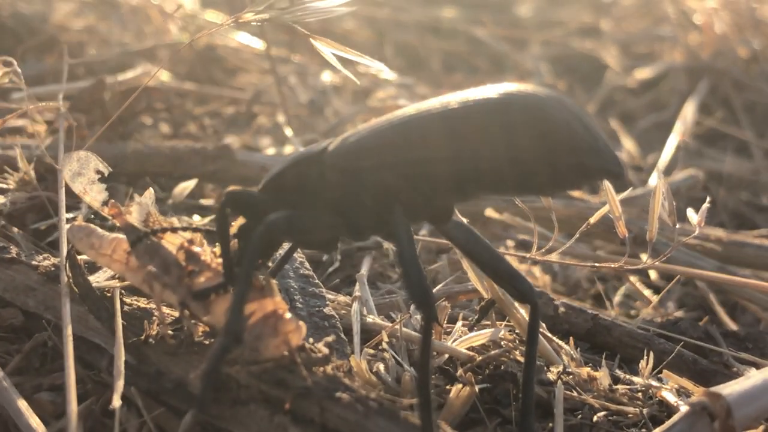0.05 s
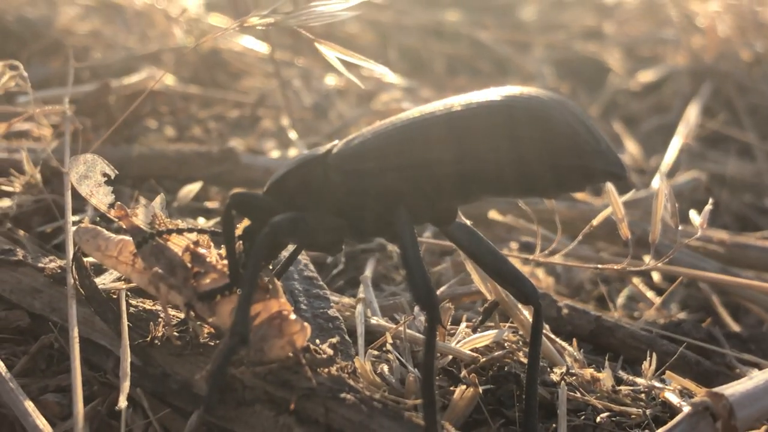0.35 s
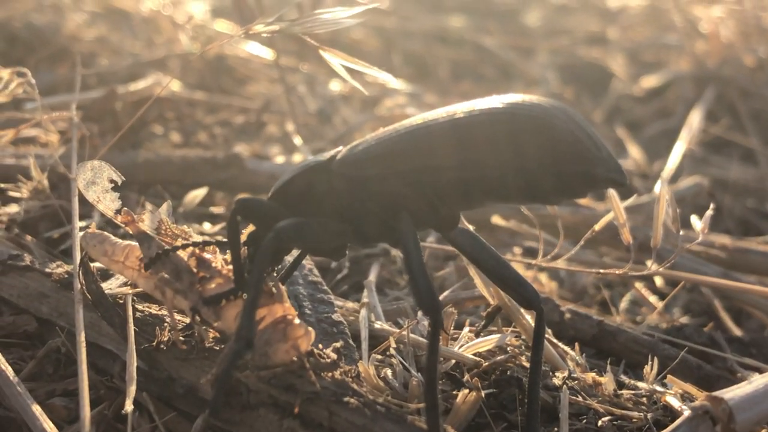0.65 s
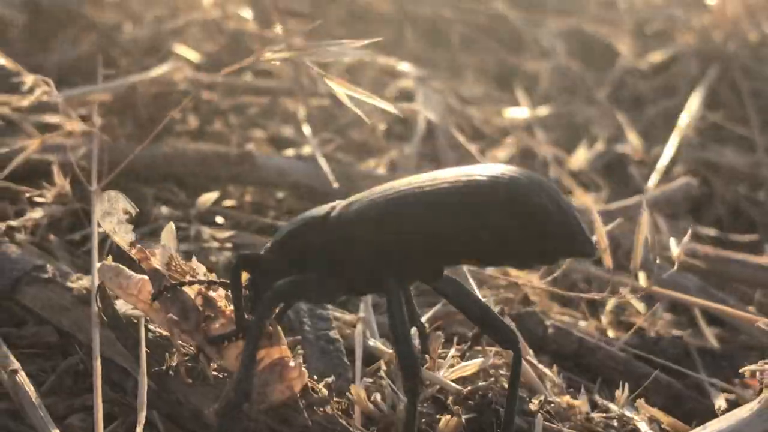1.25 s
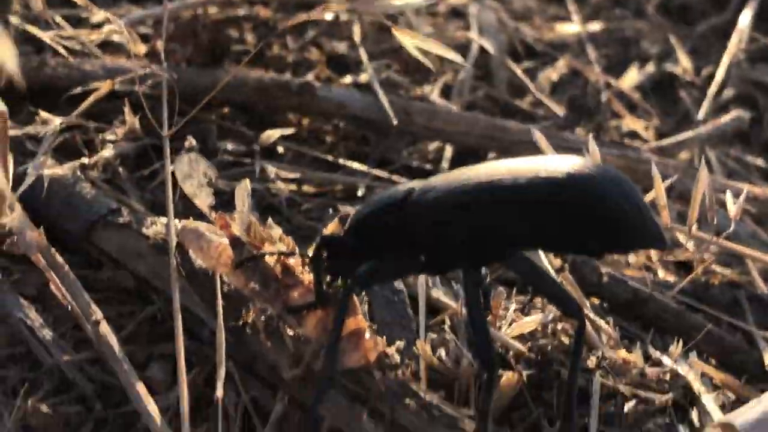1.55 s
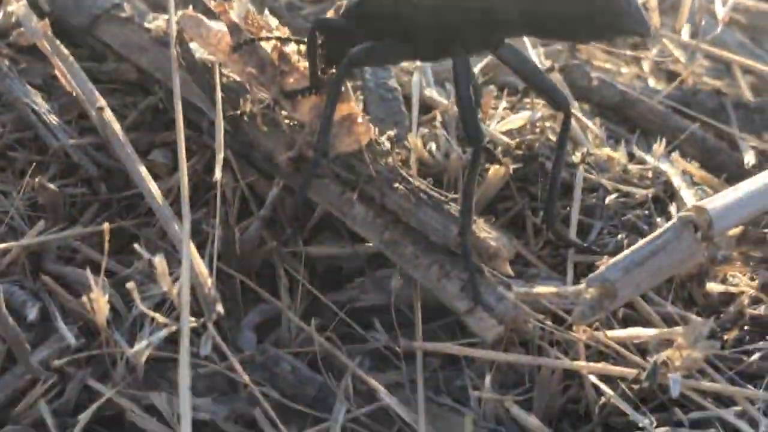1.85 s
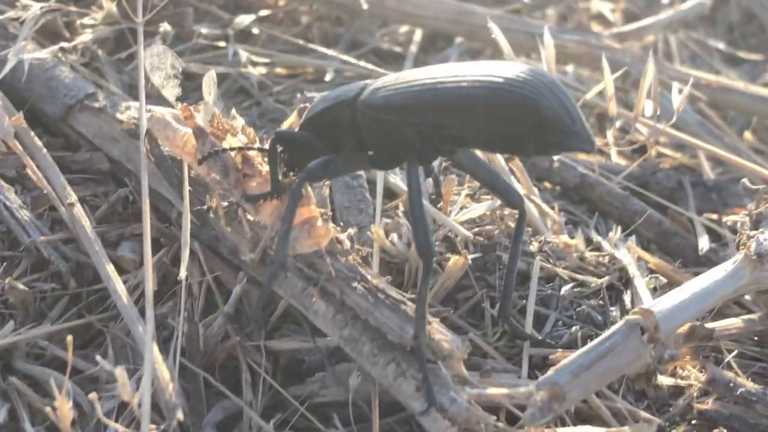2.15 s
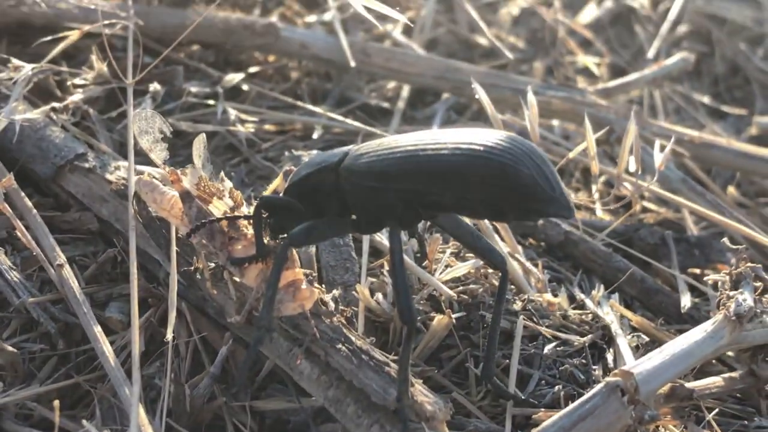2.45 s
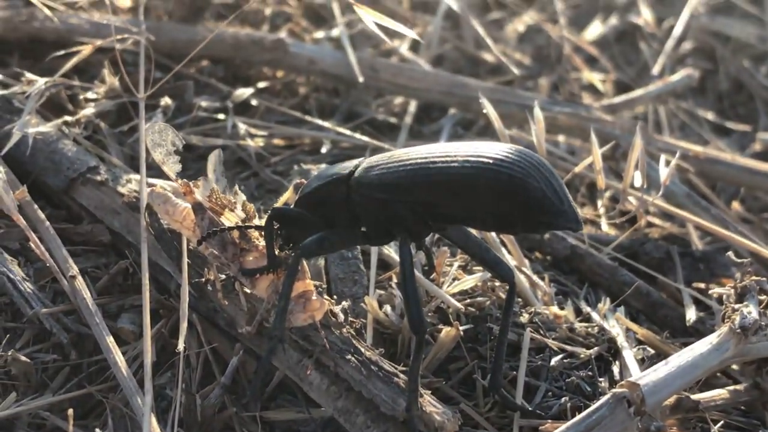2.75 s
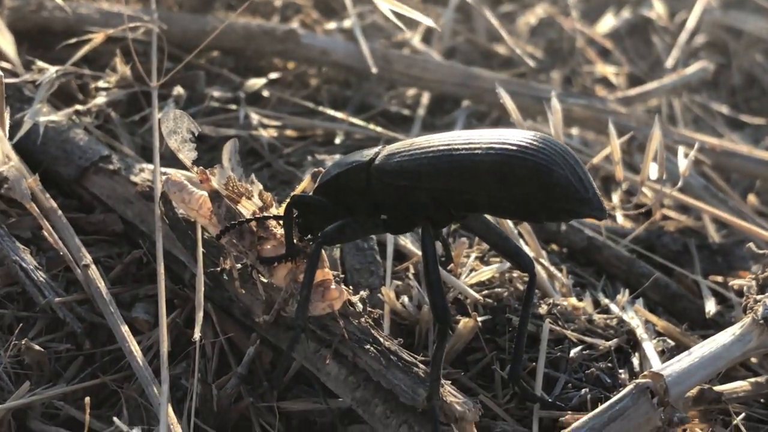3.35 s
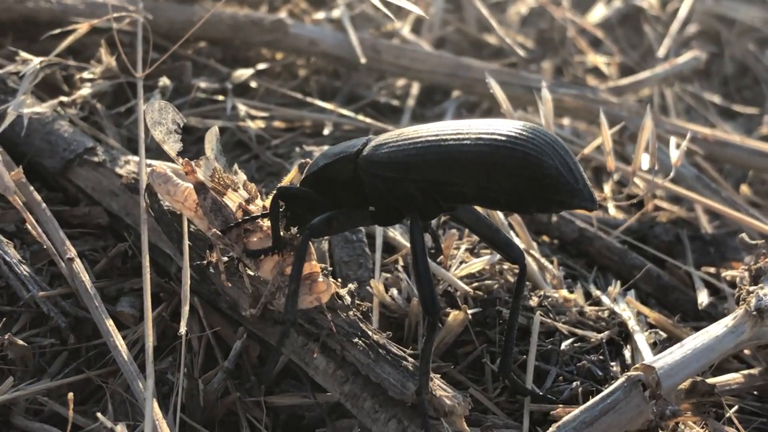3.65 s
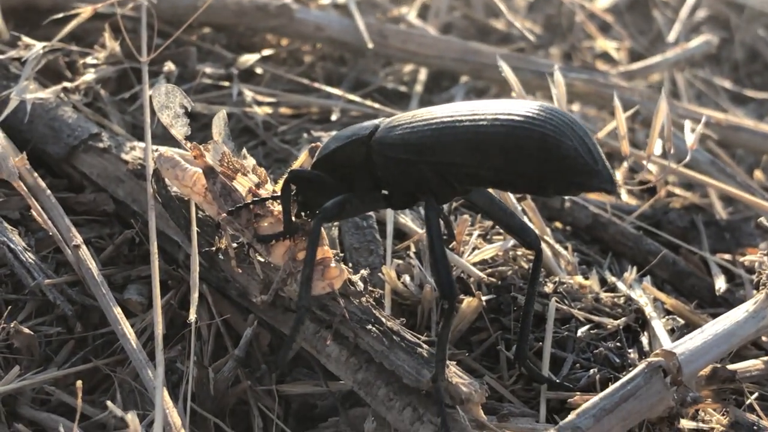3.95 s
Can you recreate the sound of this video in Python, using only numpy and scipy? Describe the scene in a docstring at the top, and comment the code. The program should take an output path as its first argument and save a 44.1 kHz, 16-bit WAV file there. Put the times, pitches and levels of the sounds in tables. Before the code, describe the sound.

Dry grass crackles and snaps softly under pressure, close by outdoors. A hand then rubs and nudges the microphone's casing, and a light breeze buffets the microphone with low rumble over a faint hush.

```python
"""Handheld camera over dry grass

Pressed straw crackles, creaks and snaps in many tiny fractures. A hand rubs along the camera
case: friction fizz over a hollow body, then light slides and nudges. The rustle dies away to
a faint outdoor hush, and a light breeze buffets the microphone with rumble and eddy thumps."""
import sys
import numpy as np
from scipy import signal
from scipy.fft import rfft, irfft
from scipy.io import wavfile

SR = 44100
rng = np.random.default_rng(int(sys.argv[2]) if len(sys.argv) > 2 else 0)


def to_wav(sig):
    """Store sig (one row per channel, or 1-D mono) as 16-bit WAV at the path in sys.argv[1].

    Samples outside -1..1 are clipped; the rate is SR.
    """
    pcm = np.clip(np.atleast_2d(sig), -1, 1) * 32767
    pcm = np.round(pcm).astype(np.int16)
    wavfile.write(sys.argv[1], SR, pcm.T)  # frames by channels


N = 176400

# Distant outdoor hush (frequency [Hz], relative density [dB])
HUSH_SPECTRUM = [(20, -16), (45, 0), (75, 4), (130, -3.5), (280, -11.5), (450, -14), (800, -19.5),
                 (1500, -28), (2500, -32), (4000, -32.5), (7000, -35.5), (10000, -37), (15800, -39)]
# Gusts on the microphone (time [s], relative level [dB])
GUST_LEVELS = [(2.38, -84), (2.45, -56.5), (2.5, -60.5), (2.61, -55), (2.69, -66.5), (2.79, -46),
               (2.93, -56), (2.99, -42), (3.03, -52), (3.08, -41), (3.115, -51), (3.15, -52), (3.186, -49),
               (3.222, -44.5), (3.31, -44), (3.384, -53.5), (3.46, -43), (3.51, -54), (3.59, -44),
               (3.66, -57.5), (3.732, -58.5), (3.774, -49), (3.82, -78), (3.88, -60.5), (3.92, -49.5),
               (4, -58)]
# Wind rumble (frequency [Hz], relative density [dB])
RUMBLE_SPECTRUM = [(20, -32), (35, -13.5), (55, 2.5), (85, 1), (140, -1), (210, -8.5), (290, -16),
                   (400, -31.5), (600, -48.5), (1200, -63)]
# Eddies (time [s], level [dB], start pitch [Hz], end pitch [Hz], rise [s], low-pass [Hz])
EDDY_HITS = [(2.971, -35.5, 111, 62.5, 0.014, 397), (3.0486, -24.5, 432, 125, 0.007, 688),
             (3.072, -30.5, 151, 49.7, 0.0059, 550), (3.13, -30.5, 282, 74.7, 0.01, 636),
             (3.446, -38.5, 108, 69.4, 0.013, 395), (3.9581, -30.5, 277, 53.4, 0.0093, 357)]

# Light brushing ahead of the rub (time [s], level [dB])
BRUSH_LEVELS = [(.7, -83), (.8, -81), (.92, -74), (.98, -69.5), (1.12, -82), (1.2, -73), (1.28, -69),
                (1.32, -90)]
# Hand rubbing the case (time [s], fizz level [dB], relative body level [dB])
RUB_LEVELS = [(1.28, -75, -78), (1.325, -69.5, -70.5), (1.348, -61, -61.5), (1.378, -59, -57),
              (1.402, -70, -71), (1.43, -66, -65.5), (1.452, -59.5, -60.5), (1.484, -68.5, -70),
              (1.508, -66, -68), (1.519, -62, -63), (1.535, -65, -69), (1.575, -68, -70),
              (1.596, -61.5, -60), (1.612, -61, -63), (1.64, -72, -69), (1.672, -68, -63),
              (1.708, -81, -82.5), (1.78, -79, -75)]
# Friction fizz (frequency [Hz], relative density [dB])
FIZZ_SPECTRUM = [(3000, -40), (6000, -6), (8500, 0.5), (10000, 3), (12000, 5.5), (15800, 5)]
# Hollow case body (frequency [Hz], relative density [dB])
CASE_SPECTRUM = [(70, -2), (170, 1), (300, -5.5), (420, -2.5), (530, 1.5), (720, -10.5), (1000, -12),
                 (1400, -17.5), (2200, -23), (3000, -18.5), (4000, -18.5), (4800, -23.5), (5800, -28.5),
                 (9000, -61)]
# Fingers sliding lightly (time [s], level [dB])
SLIDE_LEVELS = [(1.62, -95), (1.74, -72), (1.91, -72), (1.985, -72), (2.005, -80), (2.17, -84), (2.22, -80),
                (2.29, -73.5), (2.42, -83), (2.49, -76), (2.53, -77.5), (2.75, -98)]
# Sliding skin (frequency [Hz], relative density [dB])
SKIN_SPECTRUM = [(300, 6.5), (600, 0.5), (900, 2), (1100, -2), (1250, 1), (1500, 2), (2100, -15),
                 (2700, -9), (3200, -13.5), (3900, -3), (4400, -7.5), (5000, -7.5), (5700, -15),
                 (6700, -13.5), (7600, -25), (15000, -38)]
# Grip slipping (time [s], length [s], level [dB])
SLIP_STROKES = [(1.935, 0.043, -68), (1.962, 0.021, -63.5), (1.977, 0.016, -61.5)]
# Slip friction (frequency [Hz], relative density [dB])
SLIP_SPECTRUM = [(300, 12.5), (500, 0), (1400, -13), (2100, -8), (2800, -9), (4000, -6), (4900, -3),
                 (5600, -7.5), (6600, -5), (7600, -19), (10000, -12), (13000, -10), (15800, -8)]
# Fingers nudging the case (time [s], length [s], level [dB])
NUDGE_STROKES = [(1.516, 0.011, -52.5), (1.5925, 0.015, -56.5), (2.155, 0.055, -67), (2.475, 0.029, -69),
                 (2.6035, 0.02, -55), (2.66, .02, -90), (3.337, 0.019, -60), (3.6, 0.034, -67.5)]
# Nudged case (frequency [Hz], relative density [dB])
NUDGE_SPECTRUM = [(100, -4), (280, 9.5), (520, -2.5), (900, -9), (1600, -10.5), (2300, -30), (4500, -23.5),
                  (7000, -36), (12000, -45)]

# Scatter off nearby stalks (frequency [Hz], relative density [dB])
SCATTER_SPECTRUM = [(300, -0.5), (900, 8), (3500, 4.5), (7000, -12.5), (15000, -5.5)]
# Stalks snapping (time [s], peak [dB], high-pass [Hz], treble tilt [dB/octave])
STALK_SNAPS = [(0.0134, -43.5, 2650, -5), (.0235, -47.5, 1440, -11), (.1258, -39, 2750, -1),
               (0.2, -50, 6000, -9), (.2212, -36, 3000, 1.5), (0.3068, -54.5, 1800, -21),
               (0.3884, -45, 1560, -6.5), (.4155, -45.5, 2950, -17), (0.553, -58, 3040, -4),
               (0.6051, -51, 2820, -2), (0.67, -49.5, 2900, -5), (0.7145, -51, 3500, -1),
               (0.7932, -49.5, 5100, -3), (1.0026, -43, 6000, 11), (1.0794, -32, 3500, -6),
               (1.1023, -31, 2420, -17), (1.1227, -41, 8000, 6), (1.1814, -44, 2500, -8),
               (1.3823, -35.5, 8000, 5.5), (1.4755, -45, 9000, 11), (1.5175, -47, 4000, 6),
               (1.9155, -60.5, 9000, 7), (1.9632, -52, 9000, 1), (3.9254, -49.5, 3440, -2)]
# Straw pressed and released (time [s], crackle level [dB], relative crunch level [dB])
PRESS_LEVELS = [(0, -72, -69), (.014, -67, -63), (.04, -69.5, -69), (.07, -60, -66), (.095, -59.5, -56.5),
                (.114, -66.5, -92), (.132, -59.5, -48.5), (.16, -68, -75), (.194, -75, -93),
                (.222, -66.5, -65), (.245, -79.5, -89), (.29, -80, -88), (.308, -71, -78), (.335, -80, -78),
                (.375, -72, -75), (.392, -66, -65), (.414, -63, -59), (.44, -73.5, -78), (.52, -73, -62.5),
                (.59, -77, -84), (.67, -78, -70), (.74, -76, -103), (.78, -69, -89), (.83, -75.5, -76),
                (.9, -69, -63), (.935, -75.5, -78), (.962, -68, -64.5), (1.015, -74, -68),
                (1.04, -58.5, -58), (1.076, -53, -53), (1.094, -52.5, -39), (1.112, -54, -57.5),
                (1.145, -64, -57), (1.18, -63, -73), (1.2, -67, -63), (1.25, -75.5, -63), (1.32, -77, -80)]
# Crackle and ticks (frequency [Hz], relative density [dB])
STRAW_SPECTRUM = [(600, -2), (800, -1), (1100, -1.5), (1500, 0), (1800, -3.5), (2300, -4), (3100, -2),
                  (4400, -4.5), (5300, -4.5), (6800, -2.5), (8500, -8), (11500, -9.5), (15800, -10)]
# Low crunch (frequency [Hz], relative density [dB])
CRUNCH_SPECTRUM = [(80, -10.5), (150, -1.5), (240, -2), (320, -3), (420, -5.5), (600, -15), (800, -25),
                   (1000, -17)]
# Straw creaking as it settles (time [s], length [s], level [dB])
CREAK_STROKES = [(1.105, 0.04, -58), (1.148, 0.0092, -59), (1.163, 0.027, -58.5), (1.207, 0.019, -64)]
# Creak resonances (frequency [Hz], relative density [dB])
CREAK_SPECTRUM = [(600, -11), (850, -6), (1050, 1.5), (1450, -16), (2200, 0), (2850, -13), (3700, -0.5),
                  (4600, -29), (6600, -8), (9000, -16.5), (15000, -21)]

BAND_EDGE_HZ = 15900


def amp(db):
    """Decibels to gain."""
    return 10 ** (np.asarray(db) / 20)


def unit_rms(x):
    """Scale to rms 1."""
    return x / np.sqrt(np.mean(x ** 2) + 1e-20)


def add(mix, start_s, sound):
    """Mix a sound in at start_s."""
    part = mix[max(round(start_s * SR), 0):][:len(sound)]
    part += sound[:len(part)]


def envelope(rows, column=1):
    """Gain over time from one dB column; silent outside its span."""
    rows = np.array(rows)
    return amp(np.interp(np.arange(N) / SR, np.sort(rows[:, 0]), rows[:, column], left=-140, right=-140))


def colour(x, spectrum):
    """Minimum-phase filter, falling 20 dB/octave past the spectrum's ends; output rms 1."""
    hz, db = np.transpose(spectrum)
    octave = np.log2(abs(np.fft.fftfreq(len(x), 1 / SR)) + 1)
    knots = np.log2(hz + 1)
    octaves_outside = abs(octave - np.clip(octave, knots[0], knots[-1]))
    gain_db = np.maximum(np.interp(octave, knots, db) - 20 * octaves_outside, -100)
    response = np.exp(signal.hilbert(np.log(amp(gain_db))).conj())[:len(x) // 2 + 1]
    return unit_rms(irfft(rfft(x) * response, len(x)))


def flutter(rate_hz, depth_db):
    """Random gain wandering at up to about rate_hz."""
    hz = np.fft.rfftfreq(N, 1 / SR)
    wander = irfft(rfft(rng.standard_normal(N)) / (1 + (hz / rate_hz) ** 4), N)
    return amp(depth_db * unit_rms(wander))


def grains(per_s, spread_db, hiss):
    """Tiny clicks of uneven size over smooth friction hiss."""
    size = amp(spread_db * np.minimum(rng.exponential(1, N), 5))
    clicks = size * rng.choice([-1., 1.], N) * (rng.random(N) < per_s / SR)
    return unit_rms(clicks) + hiss * rng.standard_normal(N)


def friction(hiss):
    """Dense grains of one surface dragging over another."""
    return grains(per_s=7000, spread_db=2.4, hiss=hiss)


def strokes(rows, spectrum):
    """Short spells of friction: quick swell, slower fade."""
    gain = np.zeros(N)
    for start_s, length_s, db in rows:
        progress = np.linspace(0, 1, round(length_s * SR))
        add(gain, start_s, amp(db) * np.sin(np.pi * progress ** 0.6))
    return gain * colour(friction(hiss=0.41), spectrum)


def hush(level_db=-65):
    """Steady, bass-heavy noise of the distant outdoors."""
    return amp(level_db) * colour(rng.standard_normal(N), HUSH_SPECTRUM)


def breeze(gain_db=-0.5):
    """Gusts buffet the microphone with a lumpy rumble."""
    turbulence = rng.standard_normal(N) * flutter(rate_hz=24.6, depth_db=2.5)
    return amp(gain_db) * envelope(GUST_LEVELS) * colour(turbulence, RUMBLE_SPECTRUM)


def eddies(sag_s=0.0084, edge_db=-9.5, edge_s=0.0023):
    """Each eddy strikes the microphone: a thump of quickly falling pitch."""
    out, t = np.zeros(N), np.arange(SR // 10) / SR
    for start_s, db, from_hz, to_hz, rise_s, top_hz in EDDY_HITS:
        pitch_hz = to_hz + (from_hz - to_hz) * np.exp(-t / sag_s)
        phase = 2 * np.pi * np.cumsum(pitch_hz) / SR
        swell = (t / rise_s * np.exp(1 - t / rise_s)) ** 1.82
        edge = amp(edge_db) * (t / edge_s * np.exp(1 - t / edge_s)) ** 2
        thump = swell * np.sin(phase) + edge * np.sin(1.7 * phase)
        lowpass = signal.butter(5, top_hz, fs=SR, output="sos")
        add(out, start_s, amp(db) * signal.sosfilt(lowpass, thump))
    return out


def hand(body_gain_db=3):
    """Skin drags over the case: fine fizz, hollow body, slides, slips and nudges."""
    drag = friction(hiss=0.66) * flutter(rate_hz=88, depth_db=2.0)
    fizz = (envelope(RUB_LEVELS) + envelope(BRUSH_LEVELS)) * colour(drag, FIZZ_SPECTRUM)
    body = amp(body_gain_db) * envelope(RUB_LEVELS, column=2) * colour(drag, CASE_SPECTRUM)
    slides = envelope(SLIDE_LEVELS) * colour(drag, SKIN_SPECTRUM)
    slips = strokes(SLIP_STROKES, SLIP_SPECTRUM)
    nudges = strokes(NUDGE_STROKES, NUDGE_SPECTRUM)
    return fizz + body + slides + slips + nudges


def scatter(x, gain_db=-18, decay_s=0.0071):
    """Direct sound plus a very short tail scattered by nearby stalks."""
    t = np.arange(SR // 20) / SR
    tail = colour(rng.standard_normal(len(t)), SCATTER_SPECTRUM) * np.exp(-t / decay_s)
    return x + amp(gain_db) * signal.oaconvolve(x, tail / np.linalg.norm(tail))[:N]


def snaps(crack_s=0.00026, tail_s=0.0085, tail_db=-39):
    """Stalks break: a sharp crack and a brief splintering tail each."""
    out, t = np.zeros(N), np.arange(2048) / SR
    hz = np.fft.rfftfreq(len(t), 1 / SR) + 1
    decay = np.exp(-t / crack_s) + amp(tail_db) * np.exp(-t / tail_s)
    for start_s, peak_db, low_hz, db_per_octave in STALK_SNAPS:
        tilt = amp(db_per_octave * np.log2(np.maximum(hz / low_hz, 1)))
        splinters = irfft(rfft(rng.standard_normal(len(t))) * tilt * (hz < BAND_EDGE_HZ))
        highpass = signal.cheby1(2, 3, low_hz, "high", fs=SR)
        crack = signal.lfilter(*highpass, splinters * decay)
        add(out, start_s, amp(peak_db) * crack / abs(crack).max())
    return out


def straw(tick_gain_db=-5, tick_press_cap_db=-72, crunch_gain_db=-1):
    """Pressure on dry grass drives crackle, loose ticks and low crunch; settling straw creaks."""
    press = envelope(PRESS_LEVELS)
    fractures = grains(per_s=5000, spread_db=3.5, hiss=0.31) * flutter(rate_hz=130, depth_db=1.1)
    crackle = press * colour(fractures, STRAW_SPECTRUM)
    ticks = colour(grains(per_s=320, spread_db=3.2, hiss=0), STRAW_SPECTRUM)
    ticks *= amp(tick_gain_db) * np.minimum(press, amp(tick_press_cap_db))
    crunch = colour(grains(per_s=900, spread_db=3.5, hiss=0.38), CRUNCH_SPECTRUM)
    crunch *= amp(crunch_gain_db) * envelope(PRESS_LEVELS, column=2)
    return crackle + ticks + crunch + strokes(CREAK_STROKES, CREAK_SPECTRUM)


def scene():
    """Straw, hand and wind over the hush; mono."""
    return (hush() + scatter(straw() + snaps()) + hand() + breeze() + eddies())[None]


def record(dry):
    """Steep low-pass at the band edge."""
    lowpass = signal.firwin(511, BAND_EDGE_HZ, window=("kaiser", 9), fs=SR)
    return signal.oaconvolve(dry, lowpass[None], "same")


dry = scene()
out = record(dry)
to_wav(out)
```